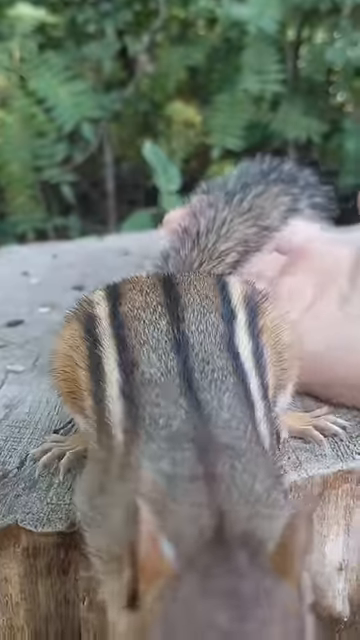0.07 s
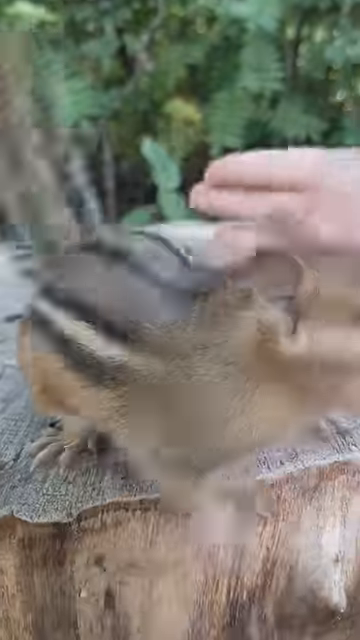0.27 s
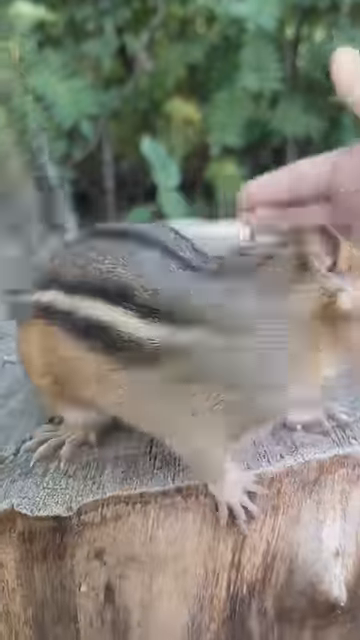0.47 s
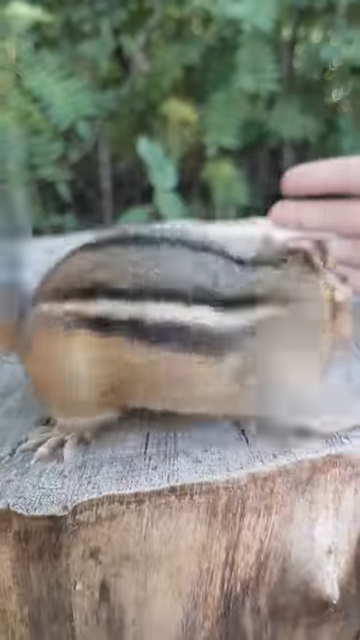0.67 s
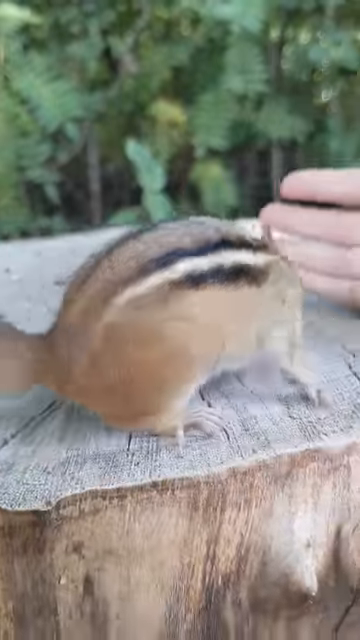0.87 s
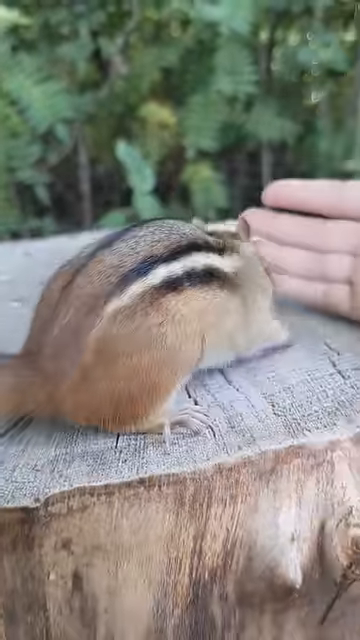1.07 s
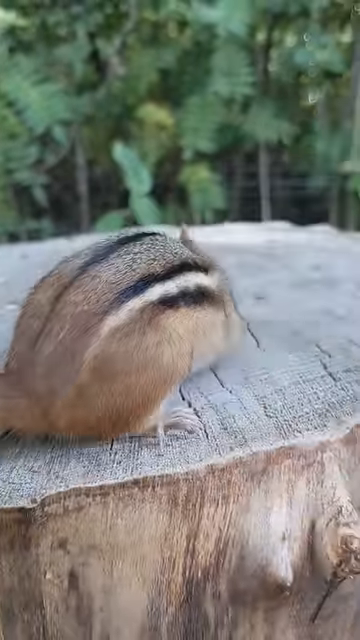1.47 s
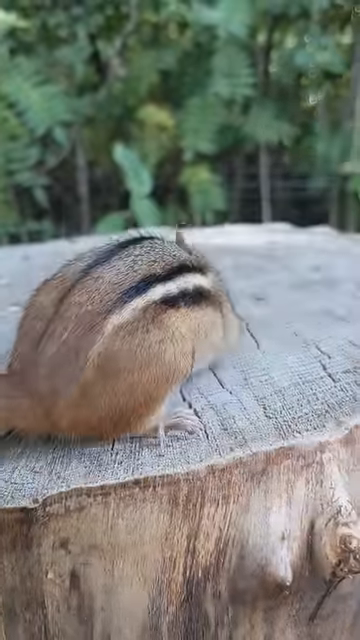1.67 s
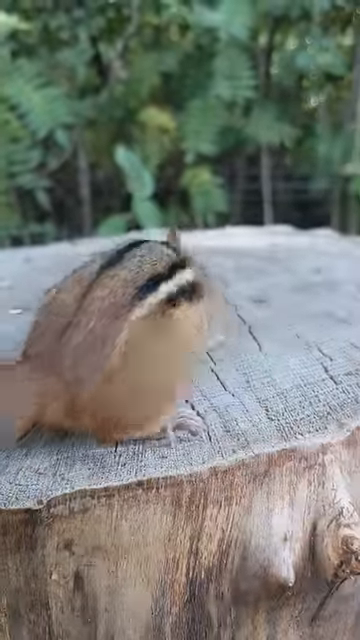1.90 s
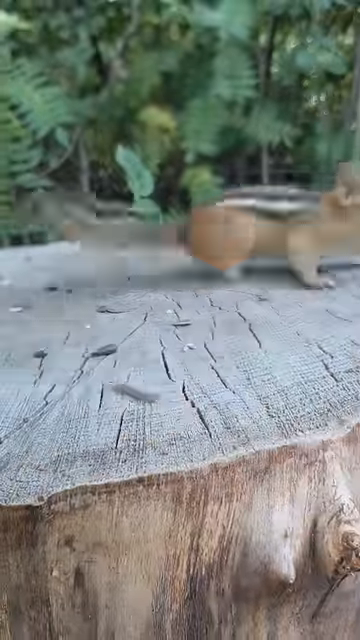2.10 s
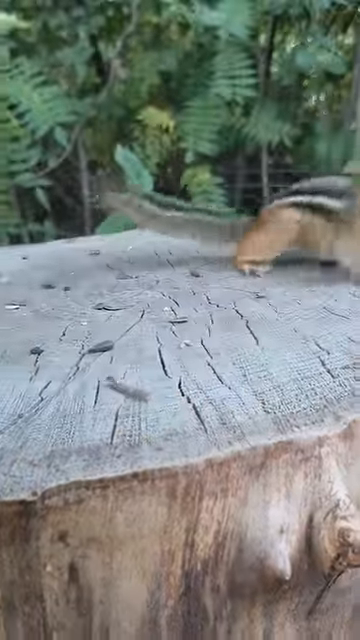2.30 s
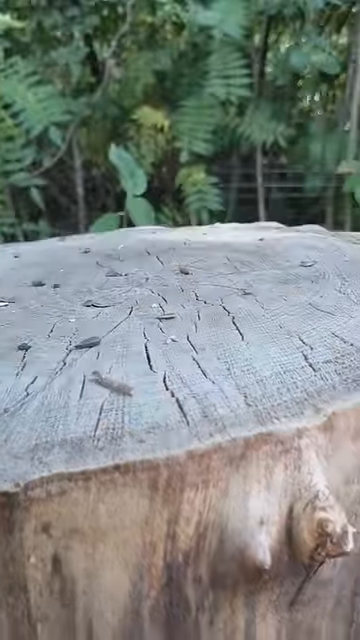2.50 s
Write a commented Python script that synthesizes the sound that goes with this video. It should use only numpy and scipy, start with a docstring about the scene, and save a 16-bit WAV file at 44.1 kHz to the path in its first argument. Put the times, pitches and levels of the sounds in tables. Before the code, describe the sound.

A bird's rapid, even yelping chirps in a garden, with other birds calling around it.

```python
"""An arched yelp, repeated about seven times a second by one bird in a leafy garden. Nearer the
microphone a songbird throws in a sharp chip between buzzy notes, both sides of its syrinx sounding
at once. Further off, others whistle, twitter and warble, and a thin nasal call swells near the end.
Trunks and leaves return a soft echo; under it all lie the outdoor hush and a low rumble."""
import sys
import numpy as np
from scipy import signal
from scipy.fft import rfft, irfft
from scipy.io import wavfile
from scipy.ndimage import uniform_filter1d

SR = 44100
rng = np.random.default_rng(int(sys.argv[2]) if len(sys.argv) > 2 else 0)


def master_out(mix):
    """Clip the mix to full scale and print it as 16-bit PCM to the path in sys.argv[1]."""
    frames = np.transpose(np.atleast_2d(mix))
    ceiling = np.clip(frames, -1, 1)
    pcm = np.round(ceiling * 32767).astype(np.int16)
    wavfile.write(sys.argv[1], SR, pcm)


N = 116865
T = np.arange(N) / SR

# Spectra of the hush, the rumble and the tick. Each row: frequency in Hz, relative level in dB.
HUSH_SPECTRUM = [(20,-15),(60,4),(120,-1),(200,-2),(480,-1.5),(700,-5.5),(1400,-13),(2500,-8.5),(3500,-16),(5000,-21.5),(8000,-26.5),(12000,-35),(15500,-28.5)]
RUMBLE_SPECTRUM = [(15,-16),(35,-21),(55,1.5),(75,-0.5),(125,-3),(180,-17.5),(400,-26),(2000,-70)]
TICK_SPECTRUM = [(500,-13),(3000,-6),(5500,-1),(8000,-5),(15000,-18)]
# Swells and dips of the rumble. Each row: time in seconds, level in dB.
RUMBLE_SWELLS = [(0,-67),(.77,-61),(.88,-53.5),(1.08,-72),(1.22,-56),(1.55,-54),(1.62,-57.5),(2.6,-51)]
# Colour of the echo from the trees. Each row: frequency in Hz, gain in dB.
ECHO_SPECTRUM = [(500,-3),(1250,-6),(1700,-4),(2350,-7),(2510,1),(2750,-0.5),(3400,3),(5200,-13.5),(10000,-7)]

# Course of the nasal call. Each row: time in seconds, pitch in Hz, level in dB.
NASAL_CALL = [(2.10,1152,-64),(2.18,1263,-59.5),(2.29,1385,-54.5),(2.38,1487,-54.5),(2.45,1599,-57),(2.52,1533,-57.5),(2.58,1530,-61),(2.62,1574,-71)]
# Colour of its harmonics and of its hoarseness. Each row: frequency in Hz, relative level in dB.
NASAL_HARMONIC_SPECTRUM = [(1230,-17),(1400,-5.5),(4700,-8)]
NASAL_HOARSE_SPECTRUM = [(1200,-36),(2300,-2.5),(3000,-7),(3300,-6),(3700,0),(4700,-6),(5400,-16),(9000,-33),(14000,-48)]
# Far whistles, twitters and faint held tones. Each row: start and length in seconds, first, middle
# and last pitch in Hz, level in dB, wobble as a share of the pitch.
FAR_NOTES = [(-.008,0.041,2480,2500,2520,-58,.004),(-.006,0.03,3880,3430,3060,-57.5,0.022),(0.038,.030,2980,3020,3630,-57.5,.015),(0.064,0.029,3650,3060,3050,-58,0.016),
             (0,0.45,479.6,464,440.6,-64,0.003),(0.391,0.03,6100,6130,6324,-47.5,0.0042),(0.513,0.025,4950,5490,6100,-41,0.019),(0.519,0.0323,2950,3300,3520,-55,.02),
             (0.558,0.054,2600,2596,2536,-52,0.0012),(.572,0.035,5000,4660,4050,-57,.12),(0.851,0.093,2486,2488,2500,-50,0.0023),
             (1.137,0.026,4100,4374,4065,-61,0.096),(1.189,0.025,4020,4300,3962,-60.5,.1),(1.272,0.034,3800,4100,4020,-62,0.13),(1.27,0.057,3520,3484,3430,-60,0.0048),
             (1.331,0.084,2090,2070,2037,-49,0.0018),(1.325,.048,3050,3075,2960,-57.5,.003),
             (1.452,0.038,4190,4190,4000,-61,0.06),(1.471,0.1,2070,2090,2065,-58.5,.004),(1.492,0.069,2950,2770,2540,-59.5,0.05),(1.567,0.03,3700,4026,3730,-58,0.04),
             (1.688,0.055,4750,5170,6000,-72,.01),(1.735,0.071,5900,6100,5980,-74,.004),(1.753,0.056,2560,2470,2460,-53.5,0.0024),
             (1.88,0.035,2800,2410,2000,-58,0.045),(1.932,0.029,4590,4770,4700,-63,0.0056),
             (1.951,0.029,4800,4530,4170,-56.5,0.004),(2.15,.15,3600,3814,3920,-59.5,0.014),(2.286,0.013,4700,5400,5630,-58,0.066),(2.273,0.024,4910,4760,4380,-56,.04),
             (2.551,0.032,3980,3447,3220,-54.5,0.034),(2.587,.029,2990,3033,3570,-56.5,0.016),
             (2.613,0.028,3490,3040,3030,-52,0.014)]
# One long falling whistle, two thin rising ones and two warbled syllables (the pairs as a list each).
# Each row: time in seconds, pitch in Hz, level in dB.
FALLING_WHISTLE = [(1.06,3580,-73),(1.085,3550,-55),(1.118,3505,-48.5),(1.145,3360,-58.5),(1.17,3305,-57),(1.20,3113,-56),(1.25,3060,-59.5),(1.28,3010,-79)]
RISING_WHISTLES = [
    [(2.03,4190,-76),(2.06,4890,-65),(2.09,5010,-67),(2.12,5296,-83),(2.135,5580,-69),(2.18,5680,-66),(2.21,6400,-75)],
    [(2.34,5460,-79),(2.37,5560,-66),(2.42,5637,-69),(2.47,5600,-70),(2.505,5920,-64),(2.535,5814,-63.5),(2.57,6160,-80)],
]
WARBLE_SYLLABLES = [
    [(2.290,2910,-66),(2.297,3855,-46),(2.305,4120,-46.5),(2.322,3850,-42),(2.328,3400,-46),(2.340,3150,-40.5),(2.346,3170,-57)],
    [(2.350,2798,-60),(2.356,2999,-45),(2.368,2990,-43.5),(2.376,3240,-43),(2.381,3545,-48.5),(2.388,3120,-42),(2.394,2950,-45),(2.400,3040,-43),(2.405,2400,-58)],
]

# The near songbird: upper and lower voice of its chip, and the buzzes on either side.
# Each row: time in seconds, pitch in Hz, level in dB.
CHIP_UPPER = [(.410,3568,-63),(.416,3504,-50),(.423,3550,-50),(.429,3980,-43.5),(.433,4723,-25),(.439,5080,-29),(.444,5310,-26.5),
              (.451,5400,-29.5),(.458,5284,-28.5),(.463,4960,-29.5),(.466,3980,-41.5),(.470,3600,-51),(.475,3270,-65)]
CHIP_LOWER = [(.428,4200,-48),(.434,4540,-29),(.440,4760,-34),(.450,4860,-41),(.459,4780,-32),(.464,4390,-41),(.467,4170,-65)]
OPENING_BUZZ = [(.342,7270,-77),(.349,7000,-60),(.362,6360,-58.5),(.385,6250,-50.5),(.402,6364,-48),(.412,6800,-60),(.421,7010,-53),(.427,7000,-60)]
CLOSING_BUZZ = [(.462,5320,-50),(.469,5220,-45),(.480,5200,-48.5),(.494,5350,-42.5),(.510,5650,-48),(.526,6210,-46.5),(0.539,6560,-52.5),(.548,6800,-70)]
# Hiss in the buzzes. Each row: frequency in Hz, relative level in dB.
BUZZ_HISS_SPECTRUM = [(2500,-25),(3500,-4.5),(4500,-1.5),(5800,-5),(7200,-23),(8200,-22),(10500,-20),(12000,-44)]

# The run of yelps. Each row: crest time in seconds, crest pitch in Hz, then levels in dB, before the
# arch shapes them, of the fundamental and of the octave on the rise, at the crest and on the fall.
YELP_RUN = [(.110,1280,-52.5,-45.5,-44,-46),(.244,1265,-52,-44.5,-41,-44.5),(.376,1286,-50,-43.5,-43,-43),(.512,1274,-50.5,-45.5,-45,-46),
            (.646,1269,-52,-48,-58.5,-49),(.781,1267,-53,-48.5,-41,-48.5),(.912,1267,-53.5,-49.5,-37.5,-47.5),(1.043,1266,-53,-48.5,-41.5,-51),
            (1.176,1265,-54.5,-48.5,-39,-52),(1.308,1265,-55,-50.5,-41,-53),(1.439,1274,-53.5,-50,-44,-50.5),(1.570,1261,-54.5,-50,-47.5,-52),
            (1.706,1265,-56.5,-48.5,-51.5,-50.5),(1.839,1256,-56.5,-48,-60,-50),(1.971,1278,-56.5,-50.5,-55,-55),(2.108,1264,-57.5,-55,-52,-55),
            (2.244,1262,-55.5,-53.5,-62,-60),(2.377,1262,-57,-51,-49,-49),(2.511,1263,-55,-49.5,-45.5,-49.5),(2.641,1267,-53.5,-48,-45,-47)]
# The arch of every yelp. Each row: seconds from the crest, share of the crest pitch, gain in dB.
YELP_ARCH = [(-.037,0.57,-23),(-.030,0.63,-12),(-.024,0.68,-4.5),(-.019,0.85,-0.5),(-.013,0.935,-1),(-.006,1,0),(0,0.99,0),
             (.007,0.987,0),(0.015,.94,-1),(.019,0.83,-2.5),(0.023,0.73,-8.5),(.033,0.55,-27.5)]
# The yelps' third harmonic. Each row: time in seconds, level in dB before the arch shapes it.
YELP_THIRD = [(.1,-69),(.8,-62.5),(1.1,-67),(1.8,-71)]

CLEAR_WOBBLE, RASP_WOBBLE = .0019, .0712   # pitch spread as a share of the pitch


def from_db(db):
    """Decibels to gain."""
    return 10 ** (np.asarray(db) / 20)


def at_hz(spectrum, hz):
    """Level of a spectrum in dB, read on a log-frequency axis."""
    freqs, db = np.transpose(spectrum)
    return np.interp(np.log(np.maximum(hz, 1)), np.log(freqs), db)


def coloured(x, spectrum):
    """Filter a sound by a spectrum."""
    bin_hz = np.arange(N + 1) * SR / (2 * N)
    return irfft(rfft(x, 2 * N) * from_db(at_hz(spectrum, bin_hz)))[:N]


def noise(spectrum):
    """Coloured noise of rms 1."""
    x = coloured(rng.standard_normal(N), spectrum)
    return x / x.std()


def tremble(size=45):
    """Quick random unsteadiness of spread 1, smoothed over size samples."""
    x = uniform_filter1d(uniform_filter1d(rng.standard_normal(N), size), size)
    return x / x.std()


def gesture(rows, size=90):
    """Smooth pitch and gain through (s, Hz, dB) points, silent outside them."""
    s, hz, db = np.transpose(rows)
    gain = from_db(np.interp(T, s, db)) * (T > s[0]) * (T < s[-1])
    return uniform_filter1d(np.interp(T, s, hz), size), uniform_filter1d(gain, size // 2)


def phase_of(hz, wobble):
    """Phase of an unsteady oscillator."""
    return 2 * np.pi * np.cumsum(hz * (1 + wobble * tremble())) / SR


def whistle(hz, gain, wobble, octave_db=-37):
    """A nearly pure bird tone, with a weak octave while its pitch is under 5600 Hz."""
    phase = phase_of(hz, wobble)
    octave = from_db(octave_db) * (hz < 5600) * np.sin(2 * phase)
    return np.sqrt(2) * gain * (np.sin(phase) + octave)


def garden_air(hush_db=-54.5):
    """The bed of the garden: a steady hush and a low rumble that swells and dips."""
    rumble_db = np.interp(T, *np.transpose(RUMBLE_SWELLS))
    return from_db(hush_db) * noise(HUSH_SPECTRUM) + from_db(rumble_db) * noise(RUMBLE_SPECTRUM)


def tick(start_s=.144, db=-56.5, decay_s=.003):
    """One tiny dry tick of fast-dying noise."""
    envelope = (T > start_s) * np.exp(-abs(T - start_s) / decay_s)
    return from_db(db) * noise(TICK_SPECTRUM) * envelope


def tree_echo(x, send_db=-11, t60_s=.68, delay_s=.0097):
    """Trunks and leaves scatter a call back to the microphone as a diffuse, dying echo."""
    response = rng.standard_normal(N) * from_db(-60 * T / t60_s) * (T > delay_s)
    response /= np.sqrt(np.sum(response ** 2))
    return from_db(send_db) * coloured(signal.fftconvolve(x, response)[:N], ECHO_SPECTRUM)


def nasal_call(split_db=-6, hiss_db=-4):
    """A slowly rising, hoarse voice: harmonics, split tones at thirds between them, and hiss."""
    hz, gain = gesture(NASAL_CALL)
    phase = phase_of(hz, wobble=.011)
    tone = sum(from_db(at_hz(NASAL_HARMONIC_SPECTRUM, k * hz)) * np.sin(k * phase) for k in (1, 2, 3))
    for thirds in (5, 7, 8, 10, 11, 13, 14):
        split_hz = thirds * hz / 3
        split_gain = from_db(split_db + at_hz(NASAL_HOARSE_SPECTRUM, split_hz))
        tone += split_gain * np.sin(phase_of(split_hz, wobble=.017))
    return gain * (np.sqrt(2) * tone + from_db(hiss_db) * noise(NASAL_HOARSE_SPECTRUM))


def far_birds(attack_share=.19, release_s=.0073):
    """Birds well back from the microphone: long whistles glide, notes bend through three pitches."""
    out = whistle(*gesture(FALLING_WHISTLE), CLEAR_WOBBLE)
    for rows in RISING_WHISTLES:
        out += whistle(*gesture(rows), wobble=.003)
    for start, length, first, middle, last, db, wobble in FAR_NOTES:
        progress = np.clip((T - start) / length, 0, 1)
        bend = np.polyfit([0, .5, 1], [first, middle, last], 2)
        attack = np.minimum(progress / attack_share, 1)
        release = np.clip((start + length - T) / release_s, 0, 1)
        out += whistle(np.polyval(bend, progress), from_db(db) * attack * release, wobble, octave_db=-30)
    return out


def warble(flutter_hz=190, flutter_depth=.45, rasp_db=-13):
    """Some way off, two slurred, fluttering syllables with a hoarse edge."""
    out = np.zeros(N)
    for rows in WARBLE_SYLLABLES:
        hz, gain = gesture(rows)
        gain *= 1 + flutter_depth * np.sin(phase_of(flutter_hz, wobble=.199))
        out += whistle(hz, gain, wobble=.0181, octave_db=-26)
        out += whistle(hz, gain * from_db(rasp_db), RASP_WOBBLE)
    return out


def songbird_chip(rasp_ratio=.96, rasp_db=-17):
    """The bird nearest the microphone sounds both sides of its syrinx at once, and the voices beat."""
    hz, gain = gesture(CHIP_UPPER)
    upper = whistle(hz, gain, CLEAR_WOBBLE)
    lower = whistle(*gesture(CHIP_LOWER), CLEAR_WOBBLE)
    octave = whistle(2 * hz, from_db(-54) * np.cbrt(gain), CLEAR_WOBBLE)   # swells more gently
    rasp = whistle(hz * rasp_ratio, gain * from_db(rasp_db), wobble=.03, octave_db=-28)
    return upper + lower + octave + rasp


def songbird_buzzes(pulse_hz=480, pitch_swing=.022, depth=.5, rasp_ratio=.87, rasp_db=-3.5, hiss_db=-6.5):
    """The same near bird: one side of the syrinx buzzes in fast pulses, the other rasps below it."""
    out = np.zeros(N)
    for rows in (OPENING_BUZZ, CLOSING_BUZZ):
        hz, gain = gesture(rows)
        pulse = np.sin(phase_of(pulse_hz, wobble=.25))
        hz *= 1 + pitch_swing * pulse
        gain *= 1 + depth * pulse
        out += whistle(hz, gain, wobble=.013)
        out += whistle(hz * rasp_ratio, gain * from_db(rasp_db), RASP_WOBBLE, octave_db=-33)
        out += gain * from_db(hiss_db) * noise(BUZZ_HISS_SPECTRUM)
    return out


def yelps(flank_pitch_drop=.12, flank_roughness=.32, shimmer_db=.5):
    """Each yelp arches up and down; its octave mostly carries it, breaking up on the flanks."""
    out = np.zeros(N)
    octave_times_s = [-.015, -.0055, .0055, .015]   # rise, both edges of the crest, fall
    sine_jitter, cosine_jitter = tremble(size=70), tremble(size=70)
    third_db = np.interp(T, *np.transpose(YELP_THIRD))
    for crest_s, crest_hz, fundamental_db, rise_db, crest_db, fall_db in YELP_RUN:
        hz, gain = gesture([(crest_s + dt, crest_hz * share, db) for dt, share, db in YELP_ARCH])
        on = gain > 1e-9
        phase = phase_of(hz, wobble=.002)[on]
        flank = (1 - hz[on] / crest_hz) / flank_pitch_drop   # 0 at the crest, growing as the pitch drops
        fundamental = from_db(fundamental_db) * np.exp(-flank ** 2) * np.sin(phase)
        rough = flank_roughness * np.clip(flank, 0, 1)
        grit = sine_jitter[on] * np.sin(2 * phase) + cosine_jitter[on] * np.cos(2 * phase)
        octave_db = np.interp(T[on] - crest_s, octave_times_s, [rise_db, crest_db, crest_db, fall_db])
        octave = from_db(octave_db) * (np.sin(2 * phase) + rough * grit) / np.sqrt(1 + 2 * rough ** 2)
        third = from_db(third_db[on]) * np.sin(3 * phase)
        out[on] += np.sqrt(2) * gain[on] * (fundamental + octave + third)
    return out * from_db(shimmer_db * tremble(size=150))


def scene():
    """The garden from one mono microphone: birds near and far, their echo, a tick and the air."""
    birds = yelps() + songbird_chip() + songbird_buzzes() + warble() + far_birds() + nasal_call()
    # The falling whistle is further off, so it lingers longer among the trees.
    lingering = from_db(3) * tree_echo(whistle(*gesture(FALLING_WHISTLE), wobble=.016))
    return (birds + tree_echo(birds) + lingering + tick() + garden_air())[None]


def record(dry, cutoff_hz=15750):
    """A steep low-pass takes the very top off the microphone signal."""
    return signal.sosfilt(signal.ellip(12, .1, 70, cutoff_hz, fs=SR, output="sos"), dry)


dry = scene()
out = record(dry)
master_out(out)
```